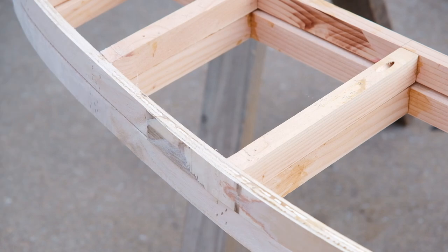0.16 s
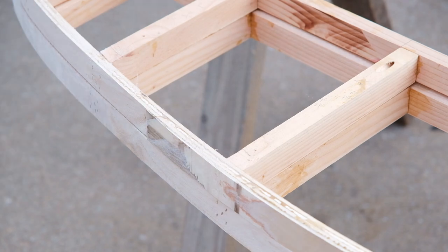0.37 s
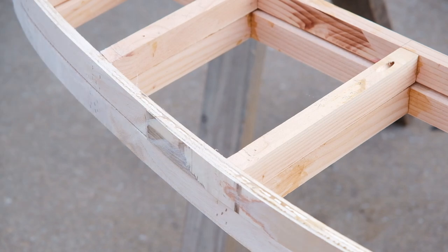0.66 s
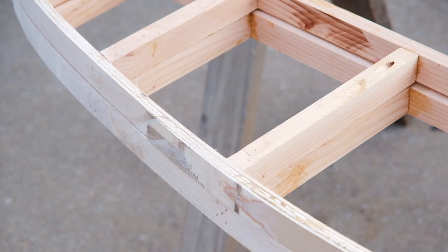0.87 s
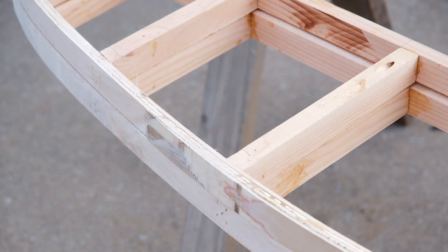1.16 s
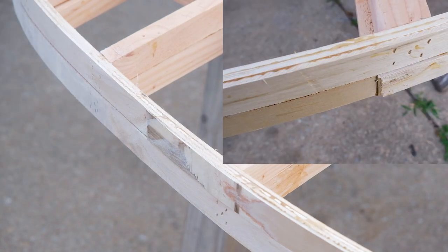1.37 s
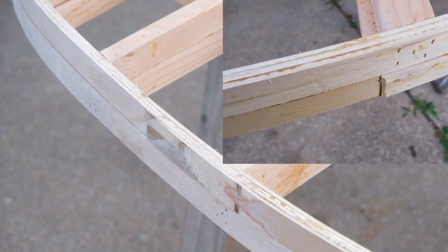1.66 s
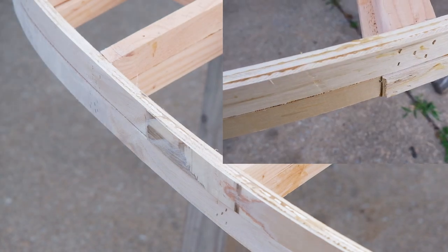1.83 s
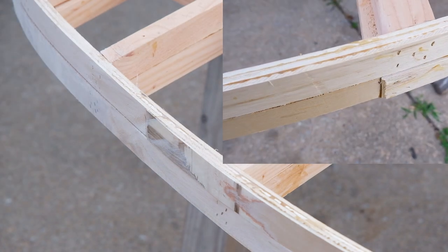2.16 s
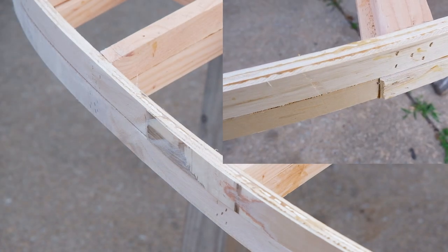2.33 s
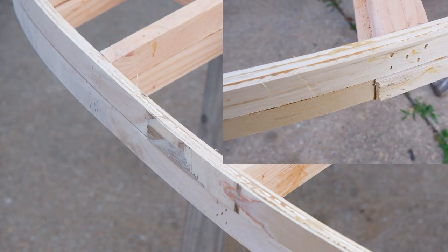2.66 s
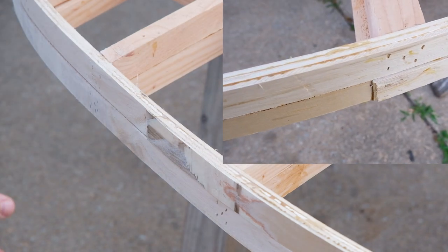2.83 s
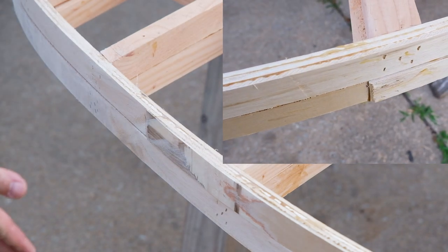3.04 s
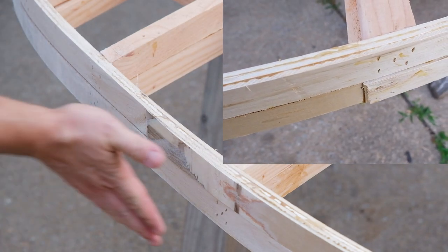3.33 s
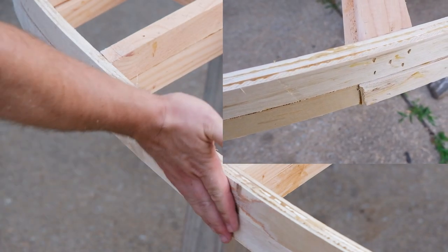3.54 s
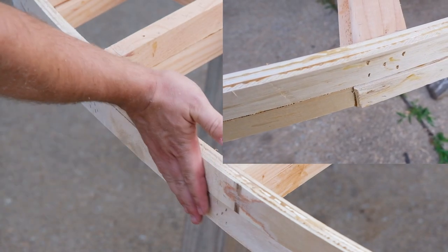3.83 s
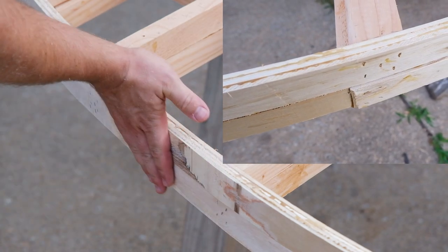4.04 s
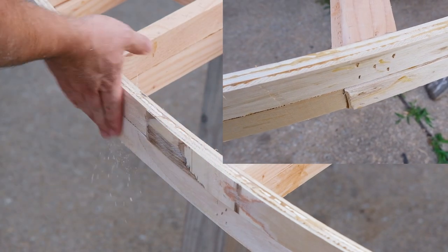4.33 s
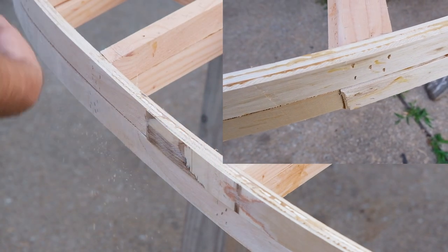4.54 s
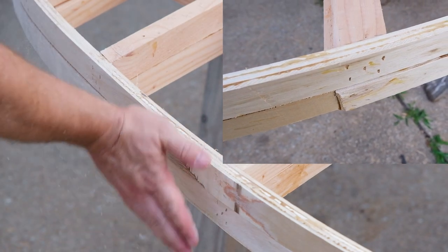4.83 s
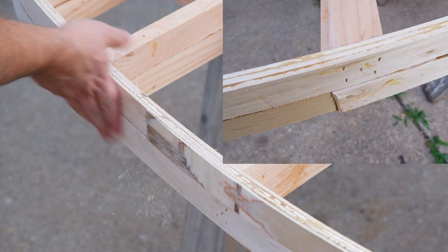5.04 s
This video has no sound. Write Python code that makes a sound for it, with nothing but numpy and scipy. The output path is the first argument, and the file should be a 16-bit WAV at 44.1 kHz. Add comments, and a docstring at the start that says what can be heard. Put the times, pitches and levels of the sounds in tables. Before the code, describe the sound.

Outdoors, straight in front of the microphone, an electric belt sander runs for an instant and then coasts down. The whine and whoosh fall and fade over several seconds, leaving the hissing rub of the sanding belt, which breaks up into little raspy catches until it stands still. One quiet sweep of a palm across wood follows, over a very low background rumble.

```python
"""Outdoors beside a wooden frame, one microphone straight ahead of a hand-held belt sander.
The sander is switched off and coasts to a stop: rotor hum, gear whine, fan tone and rushing air all sink
with the shaft speed, while the belt rubs on through the housing's fixed resonances and ends in short
scrapes. Then a hand sweeps the dust off the wood. Timbers and concrete close by throw weak echoes;
the yard rumbles in the distance."""
import sys
import numpy as np
from scipy import signal
from scipy.fft import rfft, irfft, next_fast_len
from scipy.io import wavfile

SR = 44100
rng = np.random.default_rng(int(sys.argv[2]) if len(sys.argv) > 2 else 0)


def file_out(sig):
    """Save sig as 16-bit WAV at sys.argv[1]."""
    # one column per channel
    cols = np.atleast_2d(sig).T
    # limit, then scale
    lim = np.clip(cols, -1, 1)
    pcm = np.round(lim * 32767).astype(np.int16)
    wavfile.write(sys.argv[1], SR, pcm)


N = 229006
TIME = np.arange(N) / SR
FREQS = np.maximum(np.fft.rfftfreq(N, 1 / SR), 1)

# Speeds are in shaft turns per second; an order is a multiple of the shaft speed.
# A fall is the level lost with each halving of the speed, counted from full speed.
FULL_SPEED, STALL_SPEED = 524.8, 25
SWITCH_OFF_S = .1071
LOOP_PER_TURN = .478   # rounds of the toothed drive belt per shaft turn

# critical speeds that shake the rotor, and a calm between (speed [turns/s], width [turns/s], lift [dB])
ROTOR_CRITICALS = [(491.4, 116, 13.5), (394, 62, -9), (344, 120, 13)]
# casing peaks and dips that the falling tones sweep through (frequency [Hz], width [Hz], lift [dB])
CASING_BANDS = [(605, 42, 5.5), (685, 70, -1.5), (756, 69, 2.5), (865, 220, 8), (920, 59, -6),
                (1067, 140, -6.5), (1201, 80, 8.5), (1350, 160, 3.5), (1510, 73, 5), (1600, 40, -0.5),
                (1733, 140, -8), (1846, 70, 5), (1925, 40, -6), (2030, 100, 5.5), (2150, 82, 0),
                (2270, 240, -2.5), (2500, 88, 2), (2680, 95, 2), (3020, 60, 1.5), (3340, 350, -4),
                (3960, 770, 5.5), (4600, 300, 5), (5100, 200, 1.5), (5940, 140, 6), (6850, 660, -4),
                (7500, 490, 5), (8700, 590, 2.5), (9526, 240, -16), (9750, 280, 13), (10700, 270, 2.5),
                (11000, 180, 9.5)]
# weaker tones of motor and gear (order [per turn], base level [dB], fall [dB])
MOTOR_OVERTONES = [(2.637, -56, 7.5), (21.9, -56.5, 9.5), (26.9, -57.5, 11.5), (30.9, -57, 19),
                   (33.7, -62, 16)]
# drive belt tones (harmonic [per round], base level [dB], fall [dB])
DRIVE_BELT_TONES = [(3, -54, 20), (6, -49, 20), (7, -46, 17), (8, -51.5, 16.5), (13, -55.5, 7.5),
                    (14, -52, 16), (22, -56.5, 8), (24, -61, 9)]
# a low whirr and the fan tone's rough octave (order [per turn], base level [dB], fall [dB])
LATE_WHIRR = [(5.06, -50.5, 11.5), (22.06, -60, 2)]
# where the main gear tone sings or sinks (speed [turns/s], width [turns/s], lift [dB])
MAIN_GEAR_BANDS = [(244, 22, 0), (223, 10, 7), (204, 24, -8), (175, 8, 2.5)]
# where the upper gear tone sings (speed [turns/s], width [turns/s], lift [dB])
UPPER_GEAR_BANDS = [(313, 22, 12), (245, 22, 13), (201, 22, 13.5), (160, 12, 4)]
# spectrum of the fan's turbulence (order [per turn], relative level [dB])
AIR_SPECTRUM = [(.06, -51.5), (.25, -30), (.7, -20), (1.25, -11), (2.1, -6), (3.2, -1.5), (4.6, -3.5),
                (7, -6), (9.5, -2.5), (13.5, -10.5), (19, -14), (25, -17), (35, -21.5), (48, -22),
                (70, -53)]
# growling bands and dips in that turbulence (order [per turn], width [per turn], lift [dB])
AIR_GROWLS = [(1.45, .15, 2.5), (2.6, .15, 2), (3.35, .25, 2.5), (4.85, .3, -3.5), (7.4, .7, -2.5),
              (10.6, 1.3, -2.5)]
# fixed resonances of the housing (frequency [Hz], width [Hz], lift [dB])
HOUSING_BANDS = [(570, 70, 0), (1038, 110, 10), (1316, 140, 4), (1680, 130, 2.5), (2200, 390, -6.5),
                 (2570, 180, 4.5), (2980, 110, -0.5), (3080, 110, 0.5), (4960, 230, -1), (5620, 980, 2),
                 (7070, 320, 2.5), (9800, 520, -1), (12300, 600, 2.5)]
# sanding belt rubbing over platen and rollers (frequency [Hz], relative level [dB])
RUB_SPECTRUM = [(40, -44), (150, -25.5), (350, -17), (550, -8.5), (800, -8.5), (1200, -9), (2000, 0.5),
                (3000, -4), (4500, -3.5), (6000, -7.5), (7800, -11), (9300, -19.5), (12000, -24),
                (16000, -26)]
# ringing of the sander's frame and rollers (frequency [Hz], width [Hz], relative level [dB])
FRAME_MODES = [(527, 73, -6.5), (1009, 188, -4), (1203, 110, -0.5), (1473, 115, 3), (1836, 74, -6),
               (2403, 190, 0), (2778, 220, -1), (2988, 78, -5.5)]
# bright hiss of the belt's edge (frequency [Hz], width [Hz], relative level [dB])
EDGE_MODES = [(5350, 750, 0)]
# distant outdoor rumble and faint hiss (frequency [Hz], relative level [dB])
YARD_SPECTRUM = [(20, -8.5), (70, -12), (95, -4.5), (120, 3.5), (150, -2), (250, -3), (400, -6),
                 (700, -8.5), (1200, -9.5), (2000, -20.5), (4000, -26), (7000, -33.5), (12000, -33.5),
                 (16000, -19)]
# falling tones that flare (time [s], order [per turn], half length [s], level [dB], flutter [Hz])
TONE_FLARES = [(0.173, 6.21, 0.042, -38, 45.3), (.24, 4.6, .05, -43, 110), (0.307, 3.95, 0.12, -41, 70),
               (0.377, 3.35, 0.11, -42, 30), (0.63, 3.3, 0.13, -41.5, 55), (.63, 6.69, 0.062, -41, 30),
               (.68, 10.95, 0.25, -42.5, 170), (1.03, 10.5, 0.1, -45, 130), (1.846, 10.75, .06, -45, 90),
               (1.853, 4.7, 0.048, -46, 90), (1.872, 6.21, 0.063, -47, 22), (2.048, 6.69, 0.079, -44.5, 22),
               (2.245, 7.1, 0.058, -46.5, 24.8)]
# resonances that sing up briefly, patches of the edge's hiss and short knocks (time [s], frequency [Hz], half
# length [s], level [dB], width [Hz])
RESONANCE_SWELLS = [(1.253, 1232, 0.12, -44, 22), (1.4, 1560, 0.28, -48, 90), (1.45, 2650, .25, -51, 60),
                    (1.601, 3000, 0.19, -49, 110), (1.6, 1040, 0.29, -54, 22), (2.02, 2650, 0.058, -49, 80),
                    (2.234, 3480, 0.075, -48.5, 45), (2.55, 1453, .06, -51, 30), (2.6, 2900, 0.12, -50, 90),
                    (2.87, 2796, .09, -50, 100), (3.155, 2460, 0.25, -54, 110), (3.4, 2960, .2, -62, 60),
                    (3.552, 2720, 0.2, -56.5, 140), (3.87, 2860, 0.13, -63, 100),
                    (2.45, 5350, 0.12, -51.5, 110), (2.686, 5230, .06, -52.5, 90),
                    (2.88, 5650, 0.13, -51, 330), (3.2, 5750, 0.28, -62, 160), (3.146, 4980, 0.22, -61, 60),
                    (3.18, 3550, 0.033, -53, 70), (3.815, 1520, .014, -50.5, 120),
                    (3.9, 1560, 0.044, -60, 70), (4.02, 1250, 0.027, -58, 60)]
# catches of the slowing belt (time [s], level [dB], half length [s])
BELT_CATCHES = [(3.25, -50, 0.0044), (3.287, -61, .004), (3.363, -51, 0.006), (3.487, -52, 0.0045),
                (3.52, -58, 0.0056), (3.58, -62, 0.0046), (3.61, -52, 0.0045), (3.647, -60, .005),
                (3.733, -51, 0.0042), (3.772, -55, 0.0056), (3.796, -57, .004), (3.85, -58, 0.0065),
                (3.866, -55, 0.0057), (3.894, -62, .004), (3.913, -53, .006), (4.046, -56, .008),
                (4.083, -55, .008), (4.114, -56, 0.0072), (4.142, -59, .008), (4.178, -60, 0.009),
                (4.21, -62, 0.0081), (4.242, -60, 0.01), (4.271, -58, 0.011), (4.31, -61, 0.019),
                (4.36, -58, 0.01), (4.39, -62, 0.0075), (4.412, -56, 0.0069), (4.444, -66, .005),
                (4.475, -62.5, .006), (4.502, -68, .005), (4.549, -67, .008), (4.6, -60.5, 0.0062),
                (4.633, -67, .004)]
# spectrum of their rasp (frequency [Hz], relative level [dB])
SCRAPE_SPECTRUM = [(400, 0.5), (1400, 10), (2200, -12), (3500, -1.5), (5500, 3), (7600, -6.5),
                   (8800, -10.5), (12000, -14), (16000, -28)]
# metal ringing under each scrape (frequency [Hz], width [Hz], lift [dB])
METAL_BANDS = [(3100, 220, 13), (4100, 350, 2), (5500, 400, 1), (7240, 200, 11), (7750, 400, 6)]
# palm on dusty wood (frequency [Hz], relative level [dB])
PALM_SPECTRUM = [(400, -20), (1200, -10), (2000, -11), (3200, -4.5), (5800, -6), (8000, -9), (11000, -12),
                 (16000, -19)]
# timber ringing under the palm (frequency [Hz], width [Hz], lift [dB])
TIMBER_BANDS = [(2350, 250, 6), (2750, 300, -3), (3280, 480, 4), (3900, 300, -2), (4550, 250, 4),
                (5950, 300, 5), (6700, 350, -4)]


def from_db(db):
    """Decibels to gain."""
    return 10 ** (np.asarray(db) / 20)


def rms_one(x):
    """Scale to unit power."""
    return x / np.sqrt(np.mean(x ** 2) + 1e-20)


def step(x, at, width):
    """A smooth rise from 0 to 1 as x passes `at`."""
    return .5 + .5 * np.tanh((x - at) / (2 * width))


def bump(at_s, half_length_s):
    """A bell-shaped envelope that peaks at 1."""
    return np.exp(-((TIME - at_s) / half_length_s) ** 2)


def white():
    """Plain noise."""
    return rng.standard_normal(N)


def drift(rate):
    """Random wander with up to about `rate` changes a second; rms 1."""
    size = next_fast_len(N)
    hz = np.fft.rfftfreq(size, 1 / SR)
    return rms_one(irfft(rfft(rng.standard_normal(size)) / (1 + (hz / rate) ** 4), size)[:N])


def grit(per_s, spread_db):
    """Random tiny contacts of uneven size; rms 1."""
    contacts = rng.random(N) < per_s / SR
    return rms_one(contacts * white() * from_db(spread_db * np.clip(white(), -2, 2)))


def tone(cycles, rough, flutter):
    """A tone following a phase in cycles, with noise of depth `rough` up to `flutter` Hz on it; rms 1."""
    wobble = 1 + rough * (drift(flutter) + 1j * drift(flutter))
    return rms_one(np.real(wobble * np.exp(2j * np.pi * cycles)))


def coloured(x, spectrum, axis=FREQS):
    """Give a white signal a spectrum; rms 1."""
    points, level_db = np.transpose(spectrum)
    gain = from_db(np.interp(np.log(axis), np.log(points), level_db))
    return rms_one(irfft(rfft(x) * gain, N))


def lift(axis, bands):
    """Gain of peaks and dips along a frequency or speed axis."""
    return from_db(sum(db / (1 + (2 * (axis - centre) / width) ** 2) for centre, width, db in bands))


def lifted(x, bands, axis=FREQS):
    """Filter a signal through peaks and dips; rms 1."""
    return rms_one(irfft(rfft(x) * lift(axis, bands), N))


def ringing(x, modes):
    """Drive a set of resonances, each applied twice for steep flanks; rms 1."""
    response = sum(from_db(db) / (1 + 1j * (FREQS - hz ** 2 / FREQS) / (1.82 * width)) ** 2
                   for hz, width, db in modes)
    return rms_one(irfft(rfft(x) * response, N))


def by_speed(speed, level_db, fall_db):
    """Gain of a part that loses `fall_db` with every halving of the speed."""
    return from_db(level_db - fall_db * np.log2(FULL_SPEED / speed))


def partials(speed, turns, table, rough, flutter):
    """Tones that fall with the shaft speed through the casing's peaks and dips."""
    out = 0
    for order, level_db, fall_db in table:
        gain = by_speed(speed, level_db, fall_db) * lift(order * speed, CASING_BANDS)
        out += gain * tone(order * turns, rough, flutter)
    return out


def loop_swing(turns):
    """One swing for each round of the drive belt."""
    return np.sin(2 * np.pi * LOOP_PER_TURN * turns)


def shaft_speed():
    """After the switch-off, dry friction, grease and fan drag brake the shaft; turns per second."""
    friction, grease, fan_drag = 68.497, .062258, .00045407
    speeds = np.linspace(FULL_SPEED, 1, N)
    braking = friction + grease * speeds + fan_drag * speeds ** 2   # turns/s lost each second
    reached_s = SWITCH_OFF_S + np.cumsum((speeds[0] - speeds[1]) / braking)
    return np.interp(TIME, reached_s, speeds)


def motor(speed, turns):
    """Rotor and drive belt hum at fixed multiples of the shaft speed and fall silent at low speed."""
    hum_gain = by_speed(speed, level_db=-46, fall_db=19.5) * lift(speed, ROTOR_CRITICALS)
    hum = hum_gain * tone(turns, rough=0.084, flutter=15)
    octave_gain = by_speed(speed, level_db=-42, fall_db=22.5) * lift(2 * speed, CASING_BANDS)
    octave = octave_gain * tone(2 * turns, rough=0.7, flutter=22)
    overtones = partials(speed, turns, MOTOR_OVERTONES, rough=0.48, flutter=22)
    belt_orders = [(harmonic * LOOP_PER_TURN, db, fall) for harmonic, db, fall in DRIVE_BELT_TONES]
    drive_belt = partials(speed, turns, belt_orders, rough=0.94, flutter=10)
    fade = np.clip(speed / 208, 0, 1) ** 7
    return fade * (hum + octave + overtones + drive_belt)


def late_whirr(speed, turns):
    """A low whirr and the fan tone's rough octave, falling almost to the stop."""
    return step(speed, at=52, width=8) * partials(speed, turns, LATE_WHIRR, rough=5.7, flutter=21)


def gear(speed, turns):
    """Two neighbouring gear tones take turns to sing as they fall; each stops below its own speed."""
    main_order, upper_order = 22.93, 23.94
    main_gain = by_speed(speed, level_db=-41.5, fall_db=10.5) * lift(speed, MAIN_GEAR_BANDS)
    main_gain *= lift(main_order * speed, CASING_BANDS)
    main = main_gain * tone(main_order * turns, rough=0.49, flutter=36)
    upper_gain = from_db(-66.5) * lift(speed, UPPER_GEAR_BANDS)
    upper = upper_gain * tone(upper_order * turns, rough=0.26, flutter=30)
    return step(speed, at=171, width=2.2) * main + step(speed, at=146, width=1.7) * upper


def fan_blades(speed, turns):
    """The blade tone: torn into a rasp by turbulence at high speed, a clear note at low speed."""
    blades, vent_hz, leak_db = 11, 912, -17
    pulley_swing = np.sin(2 * np.pi * turns / 3.6)
    warble = rms_one(1 + .42 * loop_swing(turns) + .42 * pulley_swing)   # both shake the note
    note = warble * tone(blades * turns, rough=.25, flutter=100)
    rasp = tone(blades * turns, rough=5, flutter=160)
    torn = np.clip((speed - 160) / 115, 0, .94)
    hz = blades * speed
    # below vent_hz the vents let only a little of the tone leak out
    vents = step(hz, vent_hz, width=4.4) + from_db(leak_db) * np.minimum(hz / vent_hz, 1)
    gain = by_speed(speed, level_db=-48.5, fall_db=1.3) * vents * lift(hz, CASING_BANDS)
    return gain * (np.sqrt(1 - torn) * note + np.sqrt(torn) * rasp)


def fan_air(speed, turns):
    """Eddies are shed in step with the fan, so their rush runs ever slower and lower."""
    steps_per_turn = 180   # the eddies are laid out along the shaft's angle
    level_off_speed = 475   # above this speed the rush of air gets no louder
    housing_share = .55
    orders = FREQS / SR * steps_per_turn
    eddies = lifted(coloured(white(), AIR_SPECTRUM, orders), AIR_GROWLS, orders)
    eddies = signal.resample_poly(eddies, 4, 1)
    fine_turns = np.cumsum(np.repeat(speed, 2)) / (2 * SR)   # twice the rate, so nothing folds back
    rush = np.interp(4 * steps_per_turn * fine_turns, np.arange(len(eddies)), eddies)
    rush = signal.resample_poly(rush, 1, 2)
    rush = rms_one(housing_share * lifted(rush, HOUSING_BANDS) + (1 - housing_share) * rush)
    level_db = -25.5 + 1.35 * loop_swing(turns) + 0.3 * drift(40)   # the drive belt shakes the rush
    return by_speed(np.minimum(speed, level_off_speed), level_db, fall_db=19.5) * rush


def belt_rub(speed, turns):
    """The sanding belt rubs grittily through the housing, sticking and slipping more as it slows."""
    glide_speed, turns_per_catch = 407, 1.605   # above glide_speed the belt glides: no louder
    slowness = np.clip(1 - speed / 170, 0, 1)
    stick_slip_db = (0.5 + 2.3 * slowness) * drift(53)
    stick_slip_db -= slowness * np.cos(2 * np.pi * turns / turns_per_catch)
    rub = lifted(coloured(grit(per_s=22000, spread_db=2.5), RUB_SPECTRUM), HOUSING_BANDS)
    return rub * by_speed(np.minimum(speed, glide_speed), level_db=-30.5 + stick_slip_db, fall_db=9)


def rattle(speed):
    """Loose parts tick about 16 times a turn and ring the sander's frame; a taut belt subdues them."""
    ticks = grit(per_s=16 * speed, spread_db=0.5) / np.sqrt(np.maximum(speed, STALL_SPEED))
    wander = np.cumsum(1 + .012 * drift(4))   # the pitch shifts as the belt moves over the parts
    ring = np.interp(wander, np.arange(N), ringing(ticks, FRAME_MODES))
    shaken = np.exp(-np.maximum(TIME - SWITCH_OFF_S, 0) / 0.11)   # the drive's shaking dies away
    taut = step(speed, at=325, width=37) * (1 - shaken)
    return ring * by_speed(speed, level_db=-36 - 10.5 * taut, fall_db=6.5)


def belt_edge(speed):
    """The belt's edge hisses, louder once it wanders onto its guide about two seconds in."""
    touch_db = 26.5 * step(TIME, at=2, width=0.12)
    return ringing(white(), EDGE_MODES) * by_speed(speed, level_db=-54.5 + touch_db, fall_db=15)


def close_echoes(x, count=24, level_db=-12):
    """Weak echoes from the timbers and the concrete, 4-28 ms late, ripple the spectrum."""
    lags = (rng.uniform(.004, .028, count) * SR).astype(int)
    signs = rng.choice([-1, 1], count)
    echoes = sum(sign * np.pad(x, (lag, 0), "reflect")[:N] for lag, sign in zip(lags, signs))
    gain = from_db(level_db)
    return (x + gain * echoes / np.sqrt(count)) / np.sqrt(1 + gain ** 2)


def yard():
    """Distant rumble and faint hiss, wavering gently."""
    return from_db(-61 + 1.2 * drift(4.5)) * coloured(white(), YARD_SPECTRUM)


def resonances(turns):
    """Resonances swell briefly, the belt edge's hiss flares in patches near 5-6 kHz and short knocks ring out;
    falling tones flare up on their way."""
    out = 0
    for at_s, hz, half_s, db, width in RESONANCE_SWELLS:
        out += from_db(db) * bump(at_s, half_s) * tone(hz * TIME, rough=3, flutter=width)
    for at_s, order, half_s, db, flutter in TONE_FLARES:
        out += from_db(db) * bump(at_s, half_s) * tone(order * turns, rough=.9, flutter=flutter)
    return out


def scrapes():
    """Each catch of the crawling belt is a short rasp through the sander's metal."""
    catches = sum(from_db(db) * bump(at_s, half_s) for at_s, db, half_s in BELT_CATCHES)
    rasp = coloured(grit(per_s=20000, spread_db=2), SCRAPE_SPECTRUM)
    return catches * lifted(rasp, METAL_BANDS)


def hand_sweep():
    """Skin brushes over dusty wood in one quickening stroke, pressing hardest near its end."""
    start_s, end_s, edge_s, growth_db_per_s = 4.942, 5.103, 0.0033, 36
    contact = step(TIME, start_s, edge_s) * (1 - step(TIME, end_s, edge_s))
    elapsed = np.clip(TIME, start_s, end_s) - start_s
    press_db = 2 * bump(at_s=5.063, half_length_s=.016)
    dust = lifted(coloured(grit(per_s=5100, spread_db=1), PALM_SPECTRUM), TIMBER_BANDS)
    return contact * from_db(-68 + growth_db_per_s * elapsed + press_db) * dust


def scene():
    """Sander and hand straight ahead of the microphone, the yard far off; both channels alike."""
    speed = shaft_speed()
    turns = np.cumsum(speed) / SR
    background = yard()
    tones = motor(speed, turns) + late_whirr(speed, turns) + gear(speed, turns)
    tones += fan_blades(speed, turns) + resonances(turns)
    air = fan_air(speed, turns)
    moving = step(speed, STALL_SPEED, width=12)
    belt = moving * (belt_rub(speed, turns) + rattle(speed) + belt_edge(speed)) + scrapes()
    mono = tones + close_echoes(air + belt) + hand_sweep() + background
    return np.array([mono, mono])


def record(dry):
    """The microphone dulls the highest treble, then the top is cut steeply."""
    mic_edge_hz, cutoff_hz = 12100, 15800
    hz = np.fft.rfftfreq(2 * N, 1 / SR)
    microphone = 1 / np.sqrt(1 + (hz / mic_edge_hz) ** 10)
    top_cut = 1 / (1 + (hz / cutoff_hz) ** 300)
    return irfft(rfft(dry, 2 * N) * microphone * top_cut)[:, :N]


dry = scene()
out = record(dry)
file_out(out)
```